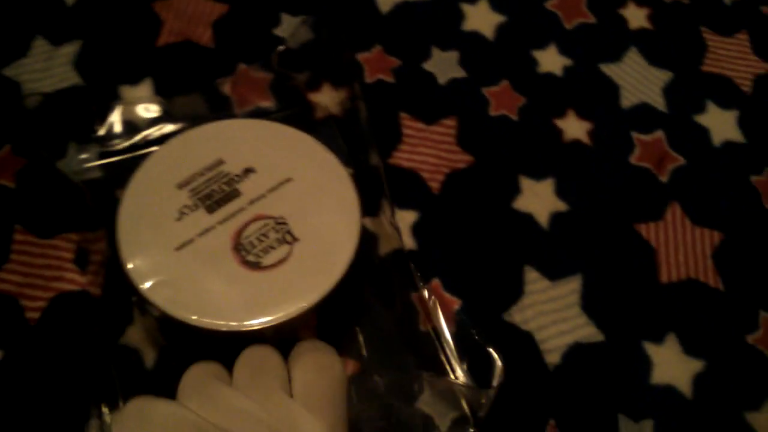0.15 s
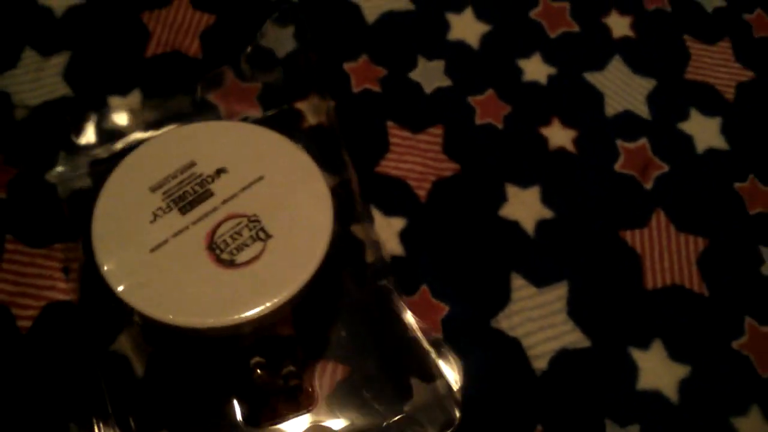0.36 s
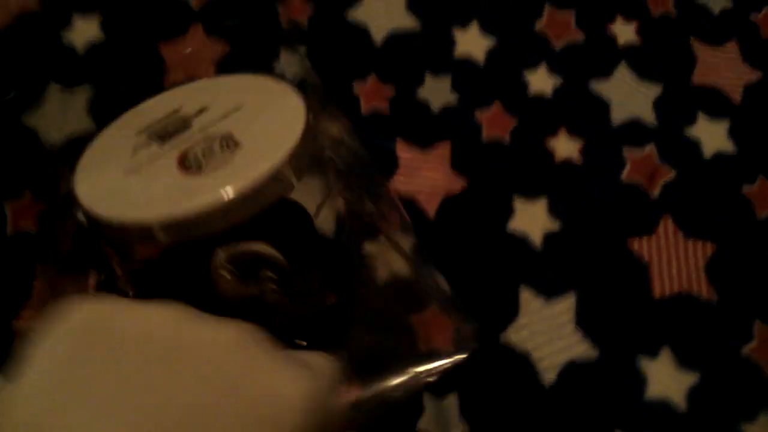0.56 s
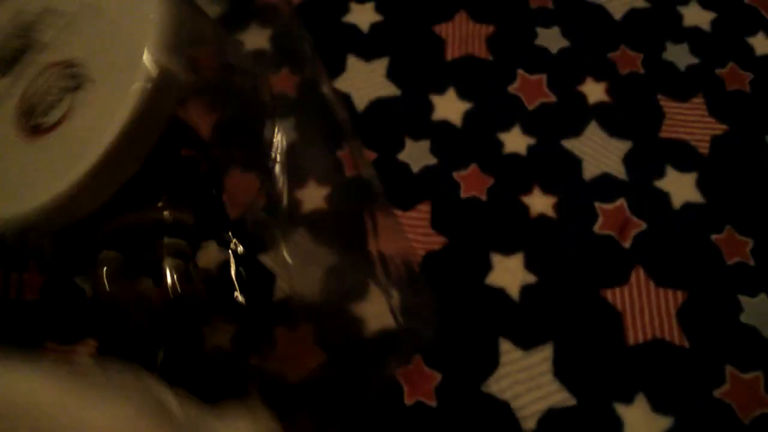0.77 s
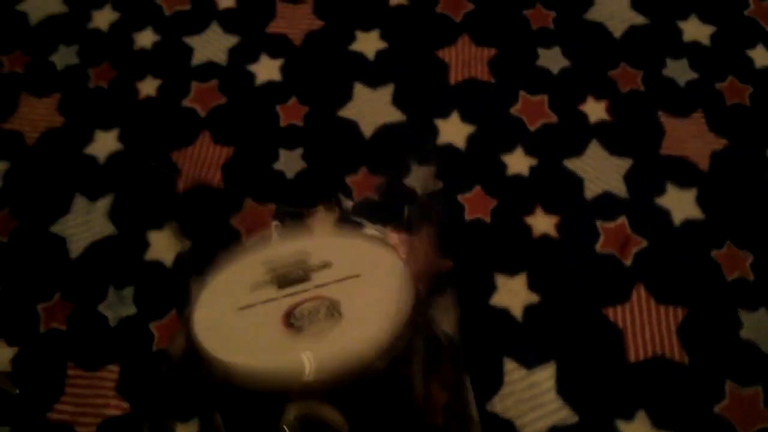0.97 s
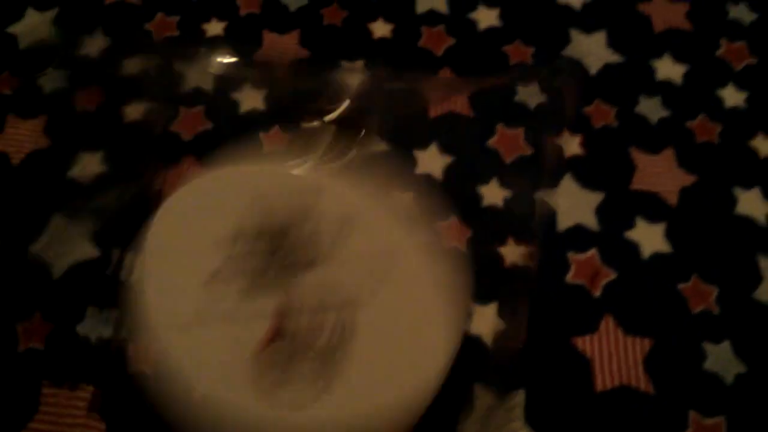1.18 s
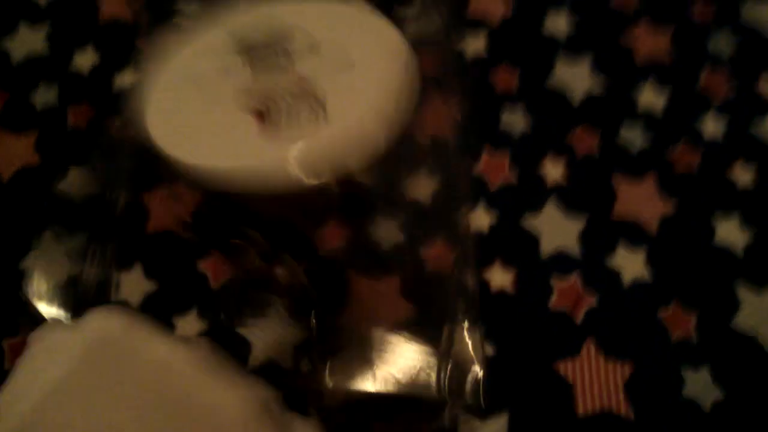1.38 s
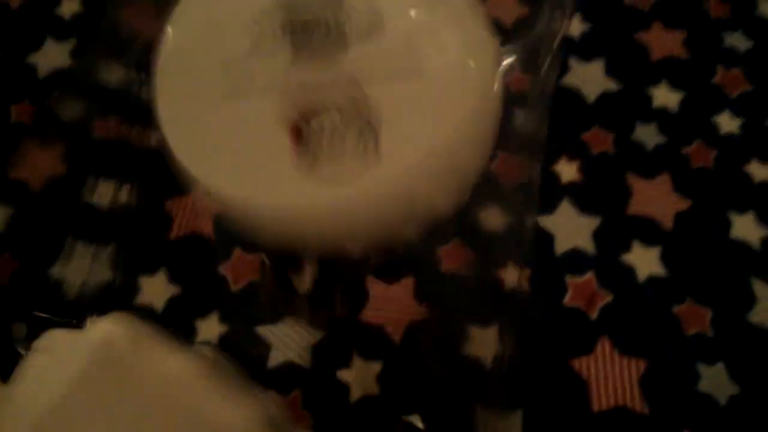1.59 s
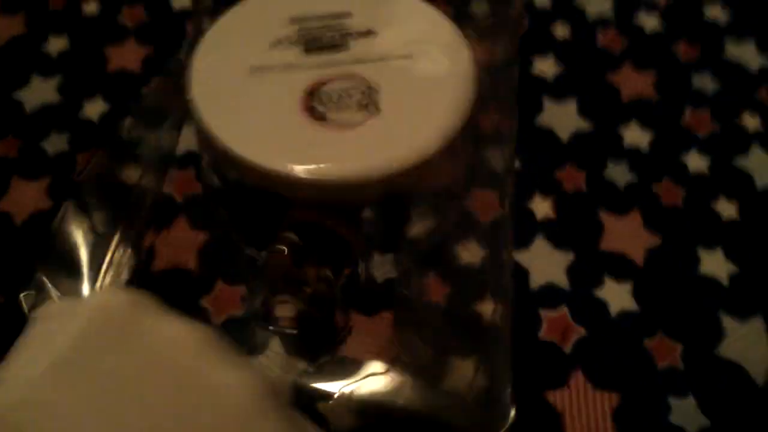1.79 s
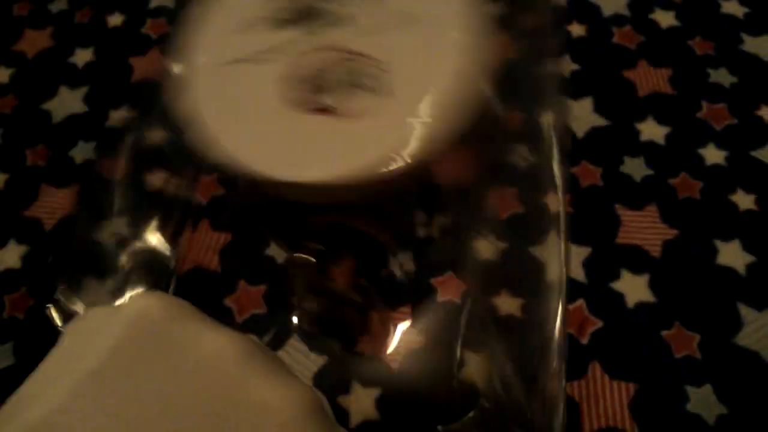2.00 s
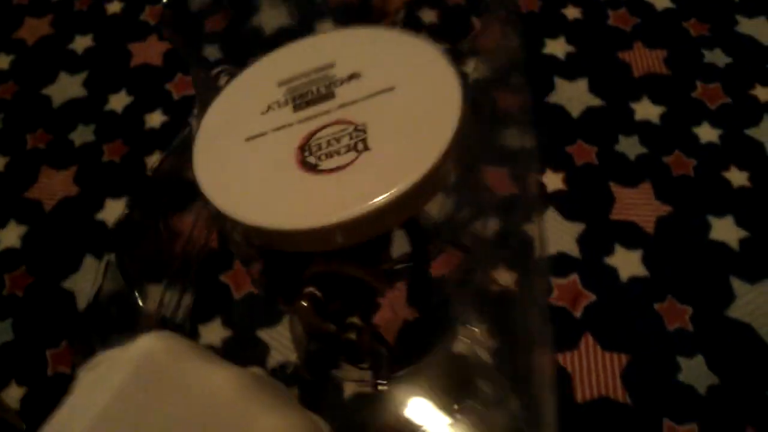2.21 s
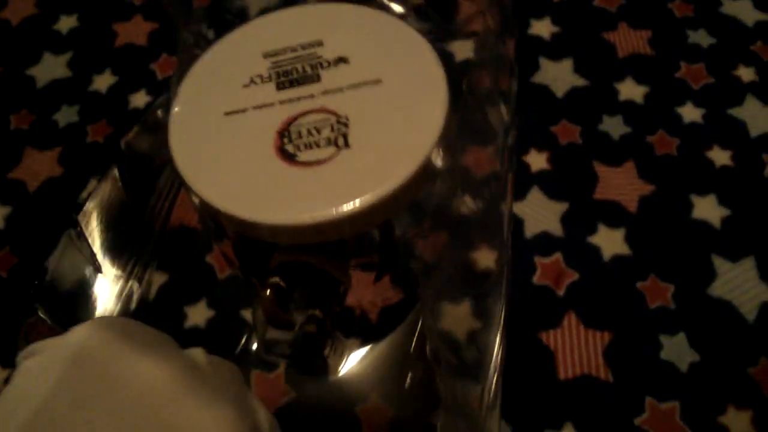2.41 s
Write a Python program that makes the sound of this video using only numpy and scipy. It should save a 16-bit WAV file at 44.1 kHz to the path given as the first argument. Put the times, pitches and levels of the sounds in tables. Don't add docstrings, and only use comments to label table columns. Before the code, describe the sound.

Stiff plastic packaging crackles close to a small microphone in a small soft room. Almost quiet with faint ticks until 0.24 s, then sharp loud snaps to 0.46 s. Light ticks and a soft finger slide follow. A hard snap hits at 0.8 s; from about 1.03 to 1.9 s dense crinkling, snaps and low grip thumps, strongest around 1.25 to 1.7 s, then sparse ticks fade into faint hush.

```python
import sys
import numpy as np
from scipy import signal
from scipy.fft import rfft, irfft, next_fast_len
from scipy.io import wavfile
from scipy.ndimage import uniform_filter1d

SR = 44100
rng = np.random.default_rng(int(sys.argv[2]) if len(sys.argv) > 2 else 0)


def amplitude_ratio(level_db):
    exponent = np.asarray(level_db, float) / 20
    return 10 ** exponent


def unload_wav(signal):
    wavfile.write(
        sys.argv[1],
        SR,
        np.round(np.clip(np.atleast_2d(signal).T, -1, 1) * 32767).astype(np.int16),
    )


N = 108045


def unit(x):
    return x / np.sqrt(np.mean(x ** 2) + 1e-20)


def coloured(x, points):
    m = next_fast_len(x.shape[-1] + 8192)
    f, db = np.transpose([(points[0][0] / 2, -60), *points, (points[-1][0] * 2, -60)])
    log_hz = np.log(np.fft.rfftfreq(m, 1 / SR) + 1)
    cepstrum = irfft(np.interp(log_hz, np.log(f), db) * np.log(10) / 20, m)
    cepstrum[1:m // 2] *= 2
    cepstrum[m // 2 + 1:] = 0
    return irfft(rfft(x, m) * np.exp(rfft(cepstrum)), m)[..., :x.shape[-1]]


def butter(x, order, hz, kind="low"):
    return signal.sosfilt(signal.butter(order, hz, kind, fs=SR, output="sos"), x)


def decay(t, burst_s, t60_s, slow=1, hold=1):
    rise = 1 - np.exp(-(t / 0.0004 / slow) ** 2)
    return rise * amplitude_ratio(-60 * np.maximum(t - hold * burst_s, 0) / t60_s)


# (frequency [Hz], level [dB])
TOP_COLOUR = [(4600, -13.5), (6300, 13), (9000, 0.5), (14500, -9)]


def crease(db, panel_db, panel_hz, top_db, spread, crack_colour):
    t = np.arange(SR // 12) / SR
    noise = rng.standard_normal((3, len(t)))
    burst_s = 0.0025 * np.exp(0.3 * rng.standard_normal())

    colour = np.array(crack_colour, float)
    colour[:, 1] += 2.2 * rng.standard_normal(len(colour))
    crack = amplitude_ratio(-9) * unit(coloured(noise[0], colour)) * decay(t, burst_s, 0.019)
    top = amplitude_ratio(top_db - 6) * unit(coloured(noise[1], TOP_COLOUR)) * decay(t, burst_s, 0.0038, slow=1.6)

    chime_hz = 4096 * (1 + 0.04 * rng.standard_normal())
    chime_db = -22.5 + 3 * rng.standard_normal()
    chime = amplitude_ratio(chime_db) * np.sin(2 * np.pi * chime_hz * t) * decay(t, burst_s, 0.026)

    detune = np.array([0, -0.5, 1.5, -2.5, 0.5]) * spread * (1 + 0.2 * rng.standard_normal(5))
    mode_hz = np.minimum(panel_hz * np.exp(detune), 1450)[:, None]
    mode_db = np.array([0, -4, -4, -13, -7]) + 2 * rng.standard_normal(5)
    modes = amplitude_ratio(mode_db)[:, None] * np.sin(2 * np.pi * mode_hz * t)
    modes = modes * decay(t, burst_s, 33.5 / mode_hz, slow=2.42, hold=0.42)
    flutter = unit(uniform_filter1d(uniform_filter1d(noise[2], size=40), size=40))
    ring = butter(modes.sum(0) * (1 + 0.23 * flutter), 2, 0.25 * panel_hz, "high")
    return amplitude_ratio(db) * (crack + top + chime + amplitude_ratio(2 + panel_db) * ring)


# (time
# [s], crack peak [dB], panel over crack [dB], panel pitch [Hz], treble over crack [dB])
CREASES = [(0.2389, -6.5, -12, 1205, -22.5), (0.2496, -17, 4.5, 893, -31),
           (0.3058, -0.5, -6, 1242, -8.5), (0.372, -19, 4.5, 776, -45.5),
           (0.3891, -20, -18, 1210, -28), (0.41, 1.5, -3, 697, -22.5), (0.4608, -4.5, 2.5, 996, -16),
           (0.804, 1.5, -6, 663, 1.5), (0.8328, -19, -4.5, 747, -5.5), (0.9769, -21.5, 5.5, 822, -26),
           (1.0317, -21.5, 8.5, 952, -28), (1.0443, -15.5, 6, 1098, -18),
           (1.056, -17, 11, 1070, -44.5), (1.135, -22, -2, 1050, -25.5),
           (1.1473, -12, -6, 964, -19.5), (1.1666, -12.5, 6, 816, -15.5), (1.1903, -13, 0, 561, -18),
           (1.2093, -12, 0, 697, -17), (1.2559, -10.5, -5, 594, -12.5),
           (1.3279, -19.5, -3.5, 692, -26),
           (1.3732, -1.5, -3, 1388, -10.5), (1.4386, -15, -3.5, 980, -17.5),
               (1.4654, -12.5, 1, 626, -17.5), (1.4867, -20, 8, 1187, -26),
               (1.5064, -18.5, 5.5, 745, -23.5), (1.5225, -6, -6, 1555, -16.5),
               (1.5319, -6.5, -10, 524, -18), (1.5875, -21.5, -15.5, 690, -26),
               (1.6105, -14, 7, 753, -23.5), (1.6205, -8, -9.5, 990, -15), (1.6346, -17.5, 10, 1313, -28),
               (1.6504, -16.5, 9, 937, -30.5), (1.6827, -12, -4, 1085, -22.5),
               (1.6985, -13.5, 2.5, 677, -22), (1.7179, -19, -12.5, 980, -17.5), (1.74, -36, 25, 1020, -27),
               (1.7653, -10.5, -12.5, 1020, -23), (1.8134, -12, -9.5, 1020, -15),
               (1.824, -17.5, 0.5, 976, -19.5), (1.832, -13.5, -15, 643, -24),
               (1.85, -17, -10.5, 1090, -42), (1.8926, -19, 2.5, 1223, -32), (1.9195, -22, 2.5, 628, -30),
               (2.0664, -19, -5, 929, -34.5),
           (.419, -23.5, 8.5, 616.5, -14), (.430, -29, 10, 936, -29), (.473, -20.5, 3, 815, -20),
                 (1.177, -22.5, 11, 899, -18), (1.195, -20.5, 2, 696, -12), (1.203, -17, -2, 586, -27.5),
                 (1.219, -23.5, 3.5, 941, -18), (1.231, -29.5, 12.5, 694, -27.5),
                 (1.240, -23.5, 9.5, 598, -21), (1.272, -16.5, 7, 705, -20.5), (1.293, -27, 6, 499, -28.5),
                 (1.318, -28, 4, 590, -22), (1.335, -22, -5, 900, -16.5), (1.385, -29, -4, 1330, -23),
                 (1.444, -19.5, 9.5, 794, -24), (1.449, -15.5, -2.5, 700, -21.5),
                 (1.457, -17, 3.5, 650, -19), (1.496, -14.5, -3, 888, -24), (.822, -46, 29, 627, -39),
                 (1.706, -26.5, 8, 912, -23.5), (.41, -40.5, 28, 370, -40.5), (1.786, -33, -10, 1180, -29),
                 (1.808, -30.5, 8.5, 1027, -13.5), (1.856, -24.5, 6, 977, -19), (1.906, -21, 5, 1130, -33),
                 (2.076, -37, 6.5, 984, -25), (.003, -54.5, 11, 804, -40), (0.017, -62.5, 5, 816, -40),
                 (.252, -49, 25.5, 345, -40), (0.816, -50.5, 22.5, 273, -40), (1.864, -60, 16, 307, -39),
                 (1.882, -47.5, 25.5, 294.6, -40), (1.908, -48, 27.5, 300, -39)]
# (time [s], crack peak [dB], panel over crack
# [dB])
FAINT_TICKS = [(0.1268, -37, -2.5), (0.1659, -43.5, -3), (0.185, -46, 0), (0.524, -29, 4),
               (0.5495, -22.5, 2), (0.5744, -29, 0), (0.6346, -23.5, -0.5), (0.6718, -33, -2.5),
               (0.7434, -38.5, 4), (0.7567, -31.5, 3.5), (1.0151, -30, 1), (2.0283, -35, 10.5),
               (2.042, -49, 12), (2.0574, -30, -2.5), (2.1758, -26.5, 3.5), (2.211, -35.5, 6),
               (0.774, -32.5, 1),
    (0.782, -43.5, 14),
    (0.793, -32, 5.5),
]
# (time [s], crack peak [dB])
CREEP_TICKS = [
    (.875, -37),
    (0.892, -36.5),
    (0.907, -40),
    (0.927, -39.5),
]
# (frequency [Hz], level [dB])
CRACK_COLOUR = [(1500, 4.5), (2700, 7.5), (3500, -1), (4500, 0.5), (6000, -9)]
# (frequency [Hz], level [dB])
TICK_COLOUR = [(1200, 2), (2000, 1), (3300, -3), (4600, -6), (5300, -24.5)]


def snaps():
    tick_hz, crease_spread, tick_spread = 1142, 0.2488, 0.12
    events = [(*row, crease_spread, CRACK_COLOUR) for row in CREASES]
    events += [(*row, tick_hz, -45.5, tick_spread, TICK_COLOUR) for row in FAINT_TICKS]
    events += [(s, db, 1.5, tick_hz, -4, tick_spread, CRACK_COLOUR) for s, db in CREEP_TICKS]
    out = np.zeros(N + SR)
    for s, *settings in events:
        sound = crease(*settings)
        out[round((s - 0.0005) * SR):][:len(sound)] += sound
    return butter(out[:N], 2, 186, "high")


def buckle_grains(hz):
    rate_per_s, pitch_spread, cycles, scatter_db = 600, 0.4125, 4.97, 3.0
    gaps_s = -np.log(1 - rng.random(3000)) / rate_per_s
    at = (np.cumsum(gaps_s) * SR).astype(int)
    at = at[at < N][:, None]
    pitch, size, phase = rng.standard_normal(at.shape), rng.standard_normal(at.shape), rng.random(at.shape)
    t = np.arange(SR // 50) / SR
    f = np.clip(hz[at] * np.exp(pitch_spread * pitch), 30, 6800)
    envelope = f ** 2.52 * t ** 2 * np.exp(-6 * f * t / cycles)
    wave = amplitude_ratio(scatter_db * size) * envelope * np.sin(2 * np.pi * (f * t + phase))
    where = at + np.arange(len(t))
    return unit(np.bincount(where.ravel(), wave.ravel(), N + SR)[:N])


# (frequency [Hz], level [dB per Hz])
FIZZ_COLOUR = [(1800, 2.5), (4400, 6), (6800, -15), (9000, -31)]


def crackle():
    rate_per_s, t60_s = 170, 0.011
    size, noise = rng.standard_normal((2, N))
    starts = (rng.random(N) < rate_per_s / SR) * amplitude_ratio(3.2 * size)
    bursts = signal.lfilter([1], [1, -amplitude_ratio(-60 / (t60_s * SR))], starts)
    return unit(coloured((bursts + 0.15) * noise, FIZZ_COLOUR))


# (time [s], effort [dB], grip weight [dB])
HAND_MOVES = [
    [(0.01, -63.5, -90), (0.194, -66, -74), (0.23, -62, -61)],
    [(0.24, -60, -49), (0.444, -27.5, -31), (0.72, -53.5, -75)],
    [(0.73, -49.5, -76), (0.824, -38, -34), (1.0, -33, -54)],
    [(1.01, -29, -58), (1.058, -19, -29), (1.13, -28, -42)],
    [(1.14, -23, -34), (1.256, -17.5, -16.5), (1.36, -31, -27)],
    [(1.38, -29.5, -36.5), (1.492, -18.5, -24), (1.58, -31, -38)],
    [(1.59, -22, -28), (1.654, -20.5, -15.5), (1.8, -32, -37)],
    [(1.81, -28, -33.5), (1.894, -25.5, -25), (2.02, -51.5, -35)],
    [(2.03, -49, -35), (2.238, -77.5, -71), (2.44, -73.5, -77.5)],
]
# (frequency [Hz], level [dB per Hz])
PANEL_COLOUR = [(500, -20.5), (750, 2.5), (1200, 13), (1700, -10), (2800, -13.5)]
# (frequency [Hz], level [dB per Hz])
THUMP_COLOUR = [(40, -9.5), (110, -6), (190, -11), (290, 3.5), (400, -13.5)]


def rustle():
    s, *columns = np.transpose([row for move in HAND_MOVES for row in move])
    effort_db, weight_db = [np.interp(np.arange(N) / SR, s, c) for c in columns]
    slack_db, taut_db = -48.5, -27.5
    taut = np.clip((effort_db - slack_db) / (taut_db - slack_db), 0, 1)

    buckle_hz = 704 * np.exp(0.0242 * (effort_db + 20))
    buckles = buckle_grains(buckle_hz) + 0.63 * unit(coloured(rng.standard_normal(N), PANEL_COLOUR))
    buckles = taut * buckles + (1 - taut) * butter(buckles, 4, 650, "high")
    fizz = amplitude_ratio(-24 + 0.084 * (effort_db + 22.5)) * crackle()

    thump = unit(coloured(rng.standard_normal(N), THUMP_COLOUR))
    thump = taut * thump + (1 - taut) * butter(thump, 4, 186)
    return amplitude_ratio(effort_db - 1.0) * (unit(buckles) + fizz), amplitude_ratio(weight_db - 1.5) * thump


# (start [s], length [s], level [dB])
FINGER_SLIDES = [
    (0.504, .15, -41),
    (0.813, .07, -42),
]
# (frequency [Hz], level [dB per Hz])
SLIDE_COLOUR = [(1500, 7.5), (7000, -6), (14500, -19)]


def slides():
    t = np.arange(N) / SR
    shape = np.zeros(N)
    for s, length_s, db in FINGER_SLIDES:
        gate = np.clip(np.minimum((t - s) / 0.014, (s + length_s - t) / 0.03), 0, 1)
        shape += amplitude_ratio(db - 140 * (t - s)) * gate
    return shape * unit(coloured(rng.standard_normal(N), SLIDE_COLOUR))


# (frequency [Hz], t60 [s])
ROOM_T60 = [(200, 0.09), (1000, .16), (4000, 0.15), (12000, 0.018)]


def room(x):
    out, step = np.zeros(N + SR), SR // 10
    f, t60_s = np.transpose(ROOM_T60)
    for a in range(0, N, step):
        hz, t, z = signal.stft(rng.standard_normal(SR // 4), SR, nperseg=256)
        band_t60_s = np.interp(np.log(hz + 1), np.log(f), t60_s)[:, None]
        tail = signal.istft(z * amplitude_ratio(-60 * t / band_t60_s), SR, nperseg=256)[1]
        tail = signal.lfilter(*signal.butter(1, 6800, fs=SR), tail)
        wet = signal.fftconvolve(x[a:a + step], tail / np.linalg.norm(tail))
        out[a + 150:][:len(wet)] += wet
    return out[:N]


# (frequency [Hz], level [dB per Hz])
HUSH_COLOUR = [(40, 1.5), (90, -7.5), (220, -36.5), (1100, -15.5), (4500, -31.5), (14500, -38)]


def hush():
    return amplitude_ratio(-68.5) * unit(coloured(rng.standard_normal(N), HUSH_COLOUR))


def scene():
    body, thump = rustle()
    near = snaps() + body + slides()
    mono = near + amplitude_ratio(-18) * room(near) + thump + hush()
    return np.array([mono, mono])


def band_limit(x):
    return signal.sosfilt(signal.butter(12, 14830, fs=SR, output="sos"), x)


def record(dry):
    clip_top = 0.94
    x = dry / (1 + np.abs(dry / clip_top) ** 8) ** (1 / 8)
    x = butter(x, 18, 14400)
    tap = np.arange(128)
    smear = rng.standard_normal(len(tap)) * amplitude_ratio(-tap * 0.2) * (tap > 20)
    side = signal.fftconvolve(np.diff(x[0], prepend=0), smear / np.linalg.norm(smear))[:N]
    side = amplitude_ratio(-21) * butter(side, 14, 4470, "high")
    return band_limit(x + side * np.array([[1], [-1]]))


dry = scene()
out = record(dry)
unload_wav(out)
```